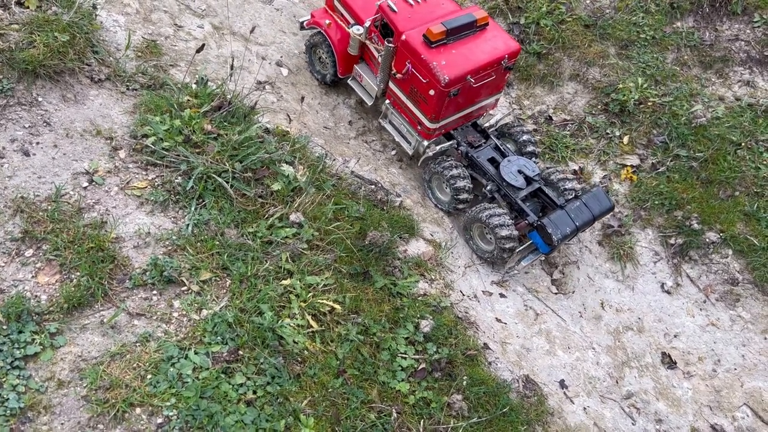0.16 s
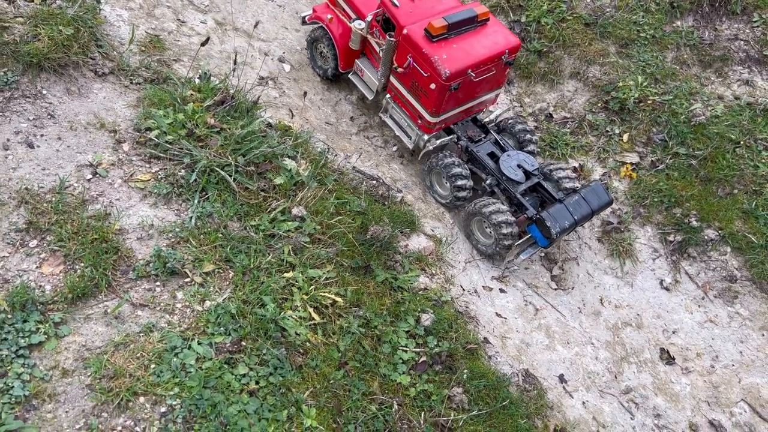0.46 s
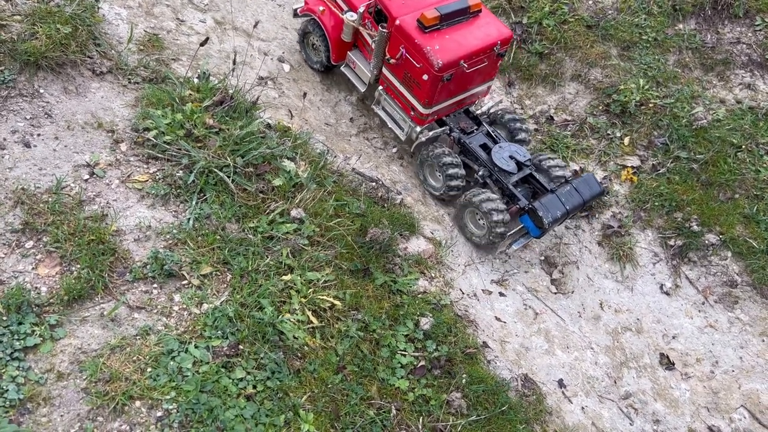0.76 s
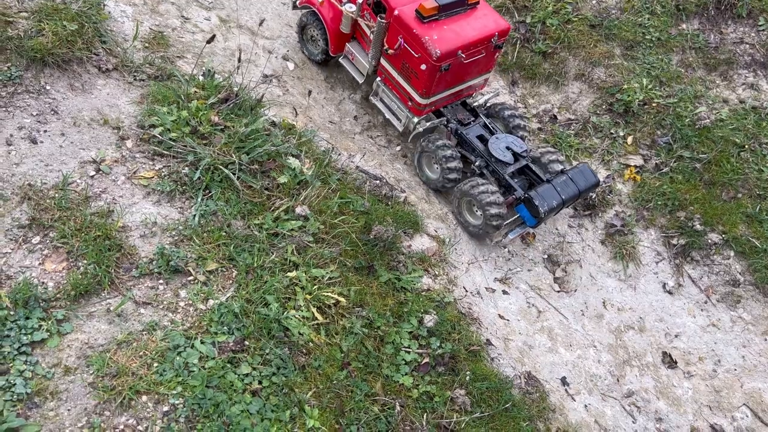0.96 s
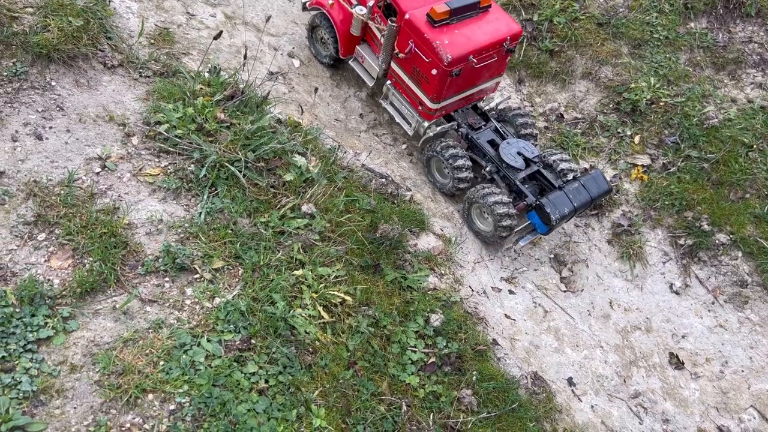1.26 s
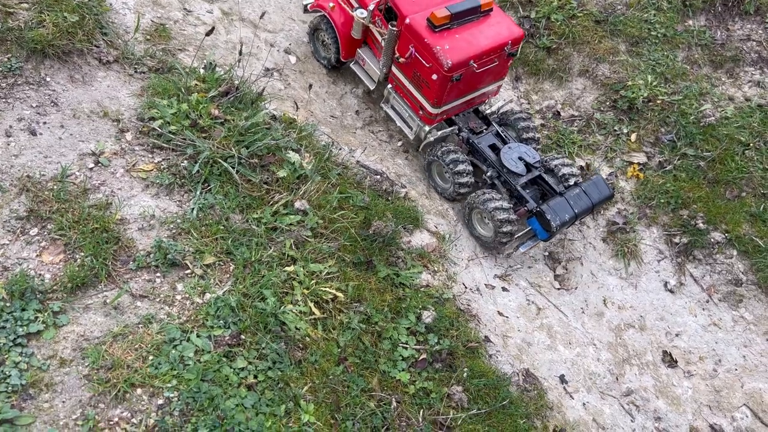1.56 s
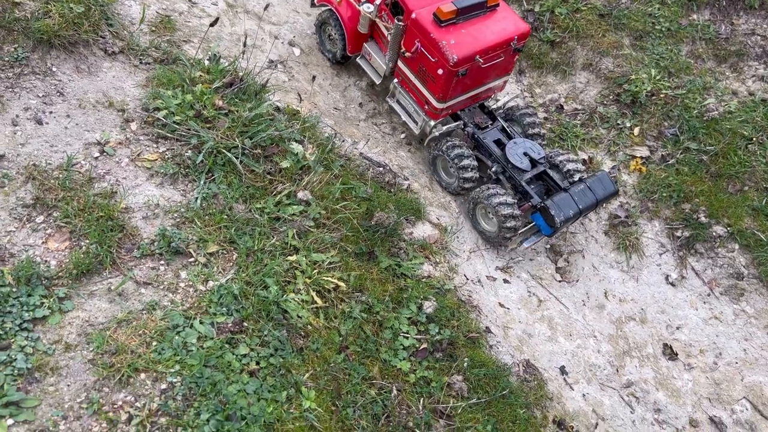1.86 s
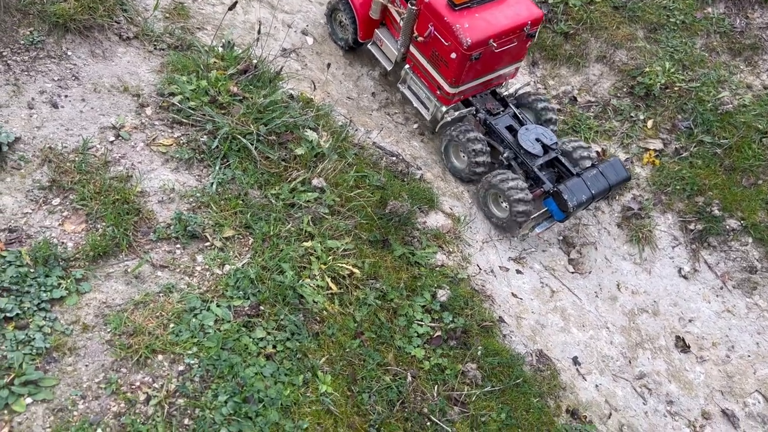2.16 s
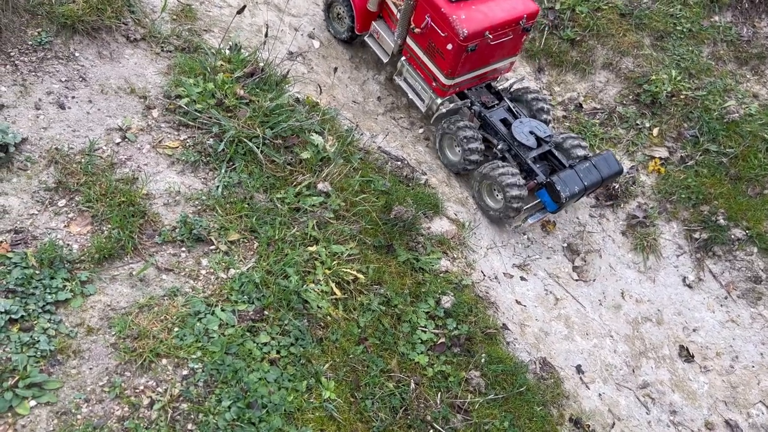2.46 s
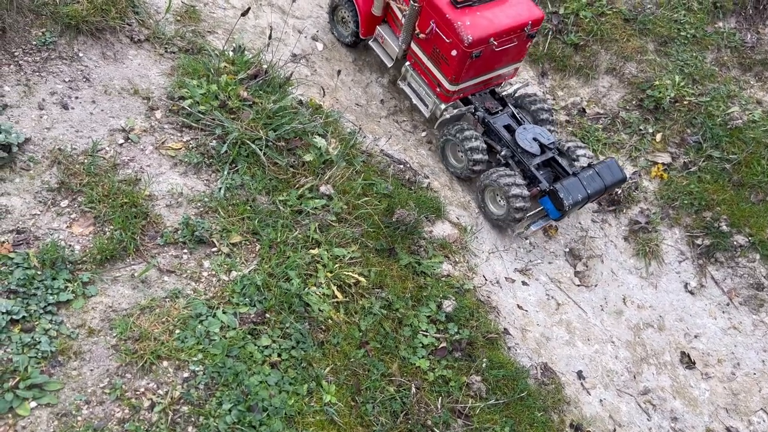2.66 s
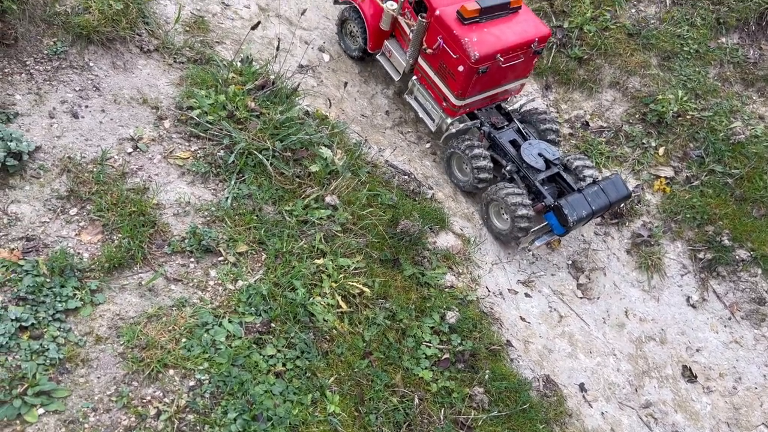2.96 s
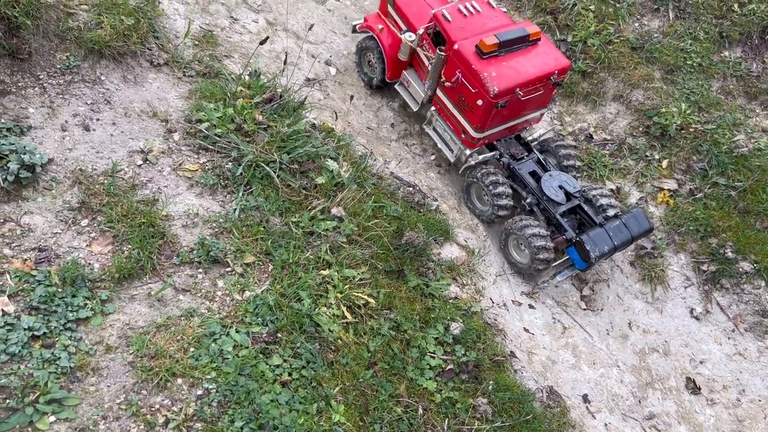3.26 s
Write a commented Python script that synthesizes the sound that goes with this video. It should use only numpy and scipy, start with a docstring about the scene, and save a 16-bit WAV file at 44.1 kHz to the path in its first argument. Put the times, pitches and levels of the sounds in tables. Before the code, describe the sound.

Small electric motor and gearbox of a toy truck whine in two gritty bursts outdoors

```python
"""On a stony slope outdoors, a radio-controlled truck struggles for grip over a low rumble.
Motor and gearbox whine in two bursts, the first clear, the second loaded and gravelly: tones at
multiples of the mesh rate pass the gear case's response, over grinding noise and clicks of grit.
The stalling drive stutters in quickening clacks, noise cracks that ring the gear housing.
Between the bursts come a sharp snap and a short hiss, both of shaped noise."""
import sys
import numpy as np
from scipy import signal
from scipy.fft import rfft, irfft
from scipy.io import wavfile

SR = 44100
rng = np.random.default_rng(int(sys.argv[2]) if len(sys.argv) > 2 else 0)


def unload_audio(sound):
    """Save the sound as a 16-bit wav file, at the path given as the first command line argument."""
    columns = np.transpose(np.atleast_2d(sound))
    # keep every value between -1 and 1, then stretch to whole-number steps
    steps = np.round(np.clip(columns, -1, 1) * 32767)
    wavfile.write(sys.argv[1], SR, steps.astype(np.int16))


N = 149940
T = np.arange(N) / SR

# left-right balance of the sound: hz, left_over_right_db
BALANCE = [(300, 0), (1200, 1.5), (2500, 1.5), (4800, 4.5), (8000, 1.5), (13000, .5)]
# how much earlier each sound reaches the left port
FREE_LEAD_S, LOADED_LEAD_S, SNAP_LEAD_S = .000068, .00005, .000125


def from_db(db):
    """Decibels to gain."""
    return 10 ** (np.asarray(db) / 20)


def rms_one(x):
    """Scale to unit power."""
    return x / np.sqrt(np.mean(x ** 2) + 1e-20)


def in_time(rows):
    """A control curve at every sample."""
    return np.interp(T, *np.transpose(rows))


def at_hz(points, hz):
    """Read a table on a log-frequency axis."""
    table_hz, values = np.transpose(points)
    return np.interp(np.log(hz), np.log(table_hz), values)


def drift(rate_hz):
    """Slow random wander of unit power: low-passed noise, made at SR / 20 and interpolated."""
    step, settling = 20, 2000
    r = np.exp(-2 * np.pi * rate_hz * step / SR)
    white = rng.standard_normal(N // step + settling + 2)
    slow = signal.lfilter([1], [1, -2 * r, r * r], white)[settling:]
    return np.interp(np.arange(N) / step, np.arange(len(slow)), rms_one(slow))


def swell(start_s, attack_s, release_s, end_s):
    """Attack, hold, release, with straight ramps."""
    return np.clip((T - start_s) / attack_s, 0, 1) * np.clip((end_s - T) / release_s, 0, 1)


def blows(rows, attack_s):
    """Sum of envelopes of short contacts that rise fast and die away exponentially."""
    envelope = 0
    for start_s, level_db, t60_s in rows:
        rise = np.clip((T - start_s) / attack_s, 0, 1)
        decay = np.clip((T - start_s - attack_s) / t60_s, 0, 3)
        envelope = envelope + rise * from_db(level_db - 60 * decay)
    return envelope


def pan(db):
    """Left and right gains for a level difference."""
    return from_db([[db / 2], [-db / 2]])


def place(x, lead_s, pan_db):
    """Delay the right channel by lead_s and set the left-right balance."""
    shift = np.exp(-2j * np.pi * np.fft.rfftfreq(N, 1 / SR) * lead_s)
    right = irfft(rfft(x[1]) * shift, N)
    return np.array([x[0], right]) * pan(pan_db)


def noise(colour, patchy_db):
    """Third-octave bands of stereo noise, each with its own level, flicker and likeness."""
    # left-right likeness: hz, correlation
    likeness = [(60, .9), (350, .97), (600, .55), (900, .65), (1300, .85), (2500, .68), (5000, .5),
                (12000, .78)]
    edges_hz = 20 * 2 ** (np.arange(30) / 3)
    white = rng.standard_normal((2, 2, N))  # neighbouring bands use different noise
    out = 0
    for k, (low, high) in enumerate(zip(edges_hz, edges_hz[1:])):
        if high < colour[0][0] or low > colour[-1][0]:
            continue
        band = signal.butter(2, [low, high], "band", fs=SR, output="sos")
        mid, side = signal.sosfilt(band, white[k % 2])
        hz = np.sqrt(low * high)
        alike = np.clip(at_hz(likeness, hz), -1, 1)
        stereo = np.sqrt(1 + alike) * mid + np.sqrt(1 - alike) * side * [[1], [-1]]
        level_db = at_hz(colour, hz) + patchy_db * drift(25)
        out = out + from_db(level_db) * pan(at_hz(BALANCE, hz)) * stereo
    return rms_one(out)


def resonant_noise(hz, width_hz):
    """Mono noise through two equal resonances in series, each width_hz wide."""
    r = np.exp(-np.pi * width_hz / SR)
    section = [1 - r, 0, r - 1, 1, -2 * r * np.cos(2 * np.pi * hz / SR), r * r]
    return rms_one(signal.sosfilt([section, section], rng.standard_normal(N)))


def rumble():
    """Low noise with a wavering hum, a narrow noise band at 58 Hz."""
    # hz, db_per_hz
    colour = [(22, -38), (40, -7), (55, 0), (85, -2), (110, -12), (140, -13), (220, -24)]
    rumble_db, hum_db = -45.5, -52
    return from_db(rumble_db) * noise(colour, patchy_db=1.5) + from_db(hum_db) * resonant_noise(58, 14)


def air():
    """Open air: faint steady noise that falls off towards the treble."""
    # hz, db_per_hz
    colour = [(200, -9), (450, -2), (700, -2), (1100, -6), (1700, -12), (2500, -19), (5000, -24),
              (8000, -31), (12000, -46)]
    return from_db(-59) * noise(colour, patchy_db=1.2)


def whirr():
    """Faint whirr near 1.7 kHz and the speed controller's thin whistle, both resonant noise."""
    # whirr level: time_s, level_db
    level = [(.03, -72), (.12, -55), (.35, -52), (1.35, -59), (1.65, -65), (1.85, -56), (2.0, -66),
             (3.25, -66), (3.38, -55)]
    whistle_db = -21  # relative to the whirr
    sound = resonant_noise(1720, 330) + from_db(whistle_db) * resonant_noise(7980, 50)
    return from_db(in_time(level)) * sound


def rolling():
    """Low murmur of the rolling wheels: shaped noise that carries a resonant hum."""
    # murmur level: time_s, level_db
    level = [(0, -68), (.14, -64), (.3, -51), (1.7, -72), (2.9, -66), (3.13, -50), (3.25, -51.5),
             (3.39, -47)]
    # hz, db_per_hz
    colour = [(200, -12), (390, -2), (560, -5), (1100, -11), (1500, -18), (3000, -19), (8000, -32),
              (12000, -47)]
    hum_db = -5  # relative to the murmur
    sound = noise(colour, patchy_db=3) + from_db(hum_db) * resonant_noise(400, 90)
    return from_db(in_time(level)) * sound


def hiss():
    """Short bright noise; its narrow resonances flutter and drop out one after another."""
    # hz, db_per_hz
    colour = [(300, -13), (1100, -4), (2100, -3), (3100, -4), (4300, 2), (6800, -3), (9300, -3),
              (12500, -7), (15500, -9)]
    # resonances: hz, width_hz (of each filter section), level_db, end_s
    resonances = [(2170, 340, -44, 1.64), (4930, 260, -39.5, 1.61), (5900, 240, -46, 1.6),
                  (6480, 300, -47, 1.66)]
    start_s, attack_s, release_s, end_s = 1.385, .07, .10, 1.665
    level_db, flutter_db = -35, 2.5
    lean = 3.2  # how many times further left the resonances lean than BALANCE
    peaks = 0
    for hz, width_hz, peak_db, stop_s in resonances:
        gain = from_db(peak_db + flutter_db * drift(50))
        envelope = swell(start_s, attack_s, attack_s / 2, stop_s)
        peaks = peaks + gain * envelope * resonant_noise(hz, width_hz) * pan(lean * at_hz(BALANCE, hz))
    gain = from_db(level_db + 1.2 * drift(60))
    return peaks + swell(start_s, attack_s, release_s, end_s) * gain * noise(colour, patchy_db=2.2)


def snaps():
    """Sharp snaps and ticks: bright noise under fast decaying envelopes."""
    # start_s, level_db, t60_s
    events = [(.411, -41, .02), (.521, -25, .012), (1.364, -32, .05), (1.3690, -6, .013),
              (1.3730, -26, .025), (1.542, -26, .025), (1.659, -35.5, .02), (2.172, -31, .012),
              (2.3065, -22, .014)]
    # hz, db_per_hz
    colour = [(200, -20), (400, -16), (900, -19), (1500, -9), (2400, -3), (3100, -6), (4200, -4),
              (5600, -2), (8000, -6), (10500, -18), (15500, -23)]
    return noise(colour, patchy_db=1.5) * blows(events, attack_s=.0014)


def knocks():
    """Dull knocks of the drive: three soft ones early, then a cluster near 2.1 s, strongest near 800 Hz."""
    # start_s, level_db, t60_s
    events = [(.153, -44, .05), (.164, -43, .05), (.3035, -39, .035), (2.040, -41, .05), (2.058, -41, .04),
              (2.0755, -29, .03), (2.0875, -15, .032), (2.0915, -21, .015), (2.105, -25, .04),
              (2.110, -24, .04), (2.119, -31, .03)]
    # hz, db_per_hz
    colour = [(150, -20), (260, -9), (480, -9), (800, 0), (1250, -9), (1500, -5), (2000, -9), (3100, -7),
              (4500, -17), (8400, -24), (15000, -32)]
    return noise(colour, patchy_db=2.5) * blows(events, attack_s=.0008)


def clacks():
    """Stalling clacks of the drive: each is a bright crack that sets the gear housing ringing."""
    # time_s, level_db
    events = [(.212, -5), (.2245, 0), (.235, -3), (.242, -8), (.2505, -11), (.439, -4), (1.203, 2),
              (1.226, -2), (1.245, 0), (1.2605, -2), (1.272, -1), (1.281, -4), (1.289, -8), (3.017, 1),
              (3.0417, -1), (3.062, 2), (3.079, 1), (3.092, 3), (3.103, -3), (3.110, -4)]
    # crack colour: hz, db_per_hz
    colour = [(300, -16), (600, -3), (850, -6), (1300, -1), (2100, -9), (3300, -9), (4600, -5), (5800, -10),
              (7800, -8), (11000, -21), (15500, -23)]
    # modes of the gear housing: hz, level_db, t60_s
    housing = [(595, 1.5, .032), (1240, -3, .025), (1350, -3, .025), (1660, -5, .022), (2620, -9, .02),
               (4620, 1, .014), (5320, -6, .015), (7110, -3, .014), (7990, -6, .014)]
    crack_db, crack_t60_s, rise_s = -21.5, .02, .003
    housing_db, housing_delay_s = -27.5, .0035
    wind_up_s = .018  # pause the drive needs to wind up fully

    cracks = [(time_s - rise_s / 2, level_db, crack_t60_s) for time_s, level_db in events]
    out = from_db(crack_db) * noise(colour, patchy_db=1.5) * blows(cracks, attack_s=rise_s)
    time_s, level_db = np.transpose(events)
    count = len(time_s)
    # quicker clacks ring the housing less
    wound = np.minimum(np.diff(time_s, prepend=0) / wind_up_s, 1)
    for hz, mode_db, t60_s in housing:
        hit_s = time_s + housing_delay_s * rng.uniform(.7, 1.3, count)
        hit_db = housing_db + level_db + mode_db + rng.normal(0, 2, count)
        hits = np.full(N, 1e-18)
        hits[(hit_s * SR).astype(int)] = wound * from_db(hit_db)
        r, w = from_db(-60 / (t60_s * SR)), 2 * np.pi * hz / SR
        ring = signal.lfilter([0, np.sin(w)], [1, -2 * r * np.cos(w), r * r], hits)
        out = out + ring * pan(at_hz(BALANCE, hz))
    return out


def grit():
    """Grains of stone cracking under the tyres: sparse bright clicks of uneven size."""
    clicks_per_s, spread_db = 1200, 2.5
    sizes = from_db(spread_db * np.minimum(rng.exponential(1, N), 4)) * rng.choice([-1, 1], N)
    clicks = sizes * (rng.random(N) < clicks_per_s / SR) + 1e-18
    band = signal.butter(1, [2500, 9000], "band", fs=SR, output="sos")
    return rms_one(signal.sosfilt(band, clicks))


def chassis(x):
    """Resonances and hollows of the chassis: a chain of peak and dip filters."""
    # hz, width_hz, gain_db
    resonances = [(180, 50, -6), (520, 90, -3), (1280, 150, -7), (1750, 130, -2), (2070, 220, 4),
                  (2840, 130, -4), (3090, 200, 4), (4150, 250, -3), (6200, 1400, -2)]
    for hz, width_hz, gain_db in resonances:
        x = x + (from_db(gain_db) - 1) * signal.lfilter(*signal.iirpeak(hz, hz / width_hz, fs=SR), x)
    return x


def drive(burst, mesh_rows, grind_colour, tone_column):
    """Gear tones glide through the gear case's response; the grinding throbs with shaft and teeth."""
    # mesh_multiple, free_burst_db, loaded_burst_db (both ahead of the gear case)
    gear_tones = [(.36, -40, -46), (.225, -43, -39), (.645, -47, -40.5), (.72, -38, -47), (1, -31.7, -37),
                  (1.31, -43, -41), (1.8, -53, -52), (2, -37.5, -58), (3, -36.3, -60), (4, -38, -60)]
    # response of the gear case: hz, gain_db
    gear_case = [(270, -10), (405, 0), (560, -6), (760, -7), (860, 2.5), (950, -2), (1085, 2), (1170, -5),
                 (1450, -2), (1650, -6), (1900, -3), (2080, 2), (2230, -8), (2900, -6), (3090, 3),
                 (3240, -5), (3370, -1), (3700, -8), (4380, -7), (4620, 3)]
    shaft_ratio, tooth_ratio = .06, gear_tones[0][0]  # throb rates as shares of the mesh rate
    shaft_throb, tooth_throb, speed_jitter = .25, .4, .008
    backlash_rate_hz = 160
    tone_db_per_octave, cruise_hz = 3, 1110  # gear tones grow with speed, unity at cruise
    start_s, attack_s, release_s, end_s, grind_db, sag_db_per_s, rough, backlash_rad, grit_db, settle_s = burst

    mesh_hz = in_time(mesh_rows)
    turn_rad = 2 * np.pi * np.cumsum(mesh_hz * (1 + speed_jitter * drift(40))) / SR
    rattled_rad = turn_rad + backlash_rad * drift(backlash_rate_hz)
    tones = 0
    for row in gear_tones:
        multiple = row[0]
        wobble = 1 + rough * (drift(45) + 1j * drift(45))
        tone = rms_one(np.real(wobble * np.exp(1j * multiple * rattled_rad)))
        gain = from_db(row[tone_column] + at_hz(gear_case, multiple * mesh_hz))
        tones = tones + gain * tone * pan(at_hz(BALANCE, multiple * cruise_hz))
    effort = from_db(tone_db_per_octave * np.log2(mesh_hz / cruise_hz))
    tones = tones * effort * swell(start_s, settle_s, settle_s, end_s)

    shaft = 1 + shaft_throb * np.cos(shaft_ratio * turn_rad)
    teeth = 1 + tooth_throb * np.cos(tooth_ratio * turn_rad)
    rubbing = noise(grind_colour, patchy_db=2.2) + from_db(grit_db) * grit()
    grinding = chassis(from_db(grind_db) * rms_one(shaft * teeth) * rubbing)
    sag = from_db(sag_db_per_s * (T - (start_s + end_s) / 2))
    return (tones + grinding) * swell(start_s, attack_s, release_s, end_s) * sag


def free_burst():
    """First burst: the gears run clear, with little backlash and tones that build quickly."""
    # start_s, attack_s, release_s, end_s, grind_db (ahead of the chassis), sag_db_per_s,
    # tone_roughness (0-1), backlash_rad, grit_db (relative to grind), tone_build_and_fade_s
    burst = (.415, .06, .058, 1.224, -31, -.5, .36, .07, -20, .045)
    # gear mesh rate: time_s, mesh_hz
    mesh = [(0.44, 690), (0.473, 850), (0.501, 1075), (0.56, 1141), (0.632, 1075), (0.696, 1154),
            (0.732, 1130), (0.755, 1078), (0.785, 1075), (0.84, 1145), (0.868, 1108), (0.92, 1098),
            (0.948, 1155), (0.975, 1132), (1.014, 1153), (1.06, 1092), (1.08, 1045), (1.122, 1012),
            (1.158, 860), (1.2, 690)]
    # grinding of gears and tyres: hz, db_per_hz
    grind = [(160, -21), (240, -4), (420, -3), (520, -5), (680, -2), (900, -2), (1300, -8), (2300, -9),
             (3300, -11), (4400, -12), (5500, -15), (8500, -16), (10500, -24), (15500, -28)]
    return drive(burst, mesh, grind, tone_column=1)


def loaded_burst():
    """Second burst: loaded and gravelly, with rougher tones and more backlash."""
    # start_s, attack_s, release_s, end_s, grind_db (ahead of the chassis), sag_db_per_s,
    # tone_roughness (0-1), backlash_rad, grit_db (relative to grind), tone_build_and_fade_s
    burst = (2.07, .03, .08, 3.035, -32.3, -2, .7, .3, -24, .27)
    # gear mesh rate: time_s, mesh_hz
    mesh = [(2.09, 900), (2.3, 1062), (2.35, 1130), (2.4, 1095), (2.46, 1140), (2.51, 1100), (2.565, 1115),
            (2.615, 1060), (2.65, 1150), (2.69, 1100), (2.72, 1140), (2.78, 1165), (2.83, 1070),
            (2.92, 1100), (3.0, 1000)]
    # grinding of gears and tyres: hz, db_per_hz
    grind = [(150, -15), (255, 1), (430, 0), (530, -5), (720, -2), (900, -5), (1120, -1), (1750, -12),
             (2600, -12), (3300, -17), (4800, -18), (6500, -22), (8500, -18.5), (11000, -28), (15500, -32)]
    return drive(burst, mesh, grind, tone_column=2)


def scatter(x):
    """Faint short tail thrown back by the slope: convolution with decaying noise."""
    tail_db, t60_s, gap_s = -20, .25, .004
    t = T[:SR // 2]
    tail = rng.standard_normal((2, len(t))) * from_db(-60 * t / t60_s) * (t > gap_s)
    tail = signal.lfilter([1], [1, -.6], tail)  # darken
    tail = tail / np.sqrt(np.sum(tail ** 2) / 2)
    return from_db(tail_db) * signal.fftconvolve(x, tail, axes=1)[:, :N]


def scene():
    """The truck's sounds and their scatter over the background."""
    background = rumble() + air() + whirr() + rolling()
    truck = (place(hiss(), SNAP_LEAD_S, pan_db=.3)
             + place(snaps(), SNAP_LEAD_S, pan_db=3.2)
             + place(clacks(), FREE_LEAD_S, pan_db=.8)
             + place(free_burst(), FREE_LEAD_S, pan_db=.2)
             + place(loaded_burst() + knocks(), LOADED_LEAD_S, pan_db=-.6))
    return background + truck + scatter(truck)


def record(dry):
    """Peaks clip at full scale, then a steep low-pass cuts the top."""
    stop_hz = 16900  # 60 dB down from here up
    low_pass = signal.cheby2(14, 60, stop_hz, fs=SR, output="sos")
    return signal.sosfilt(low_pass, np.clip(dry, -1, 1))


dry = scene()
out = record(dry)
unload_audio(out)
```